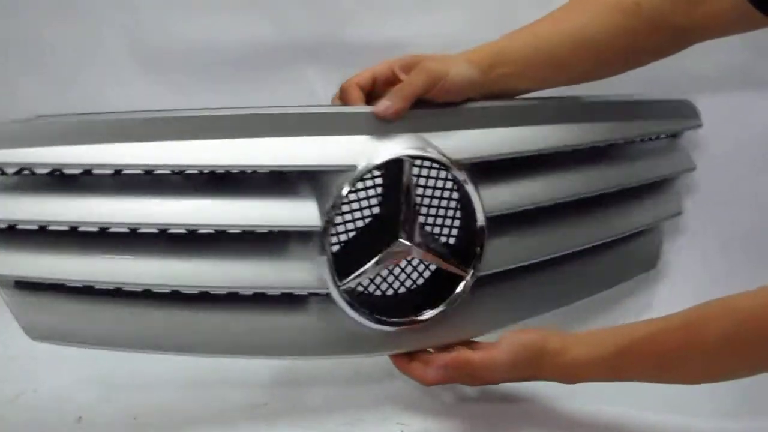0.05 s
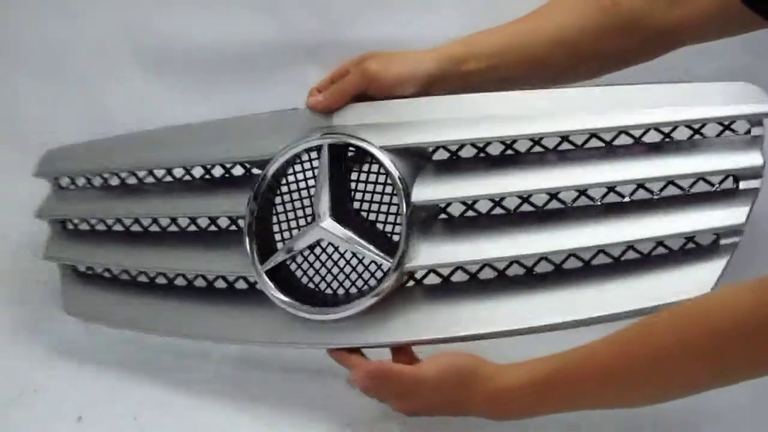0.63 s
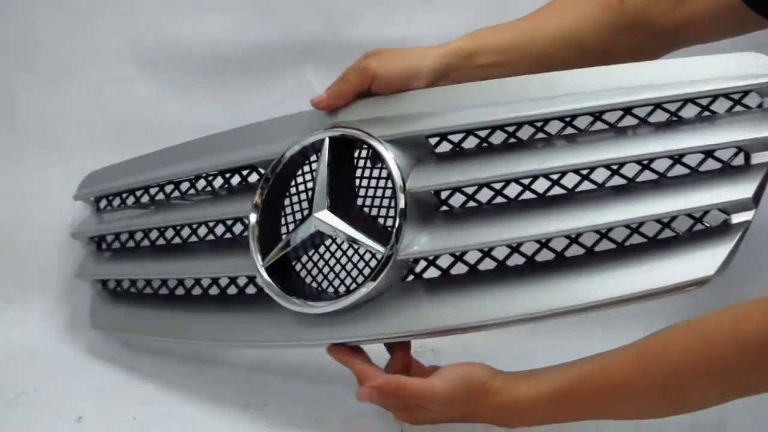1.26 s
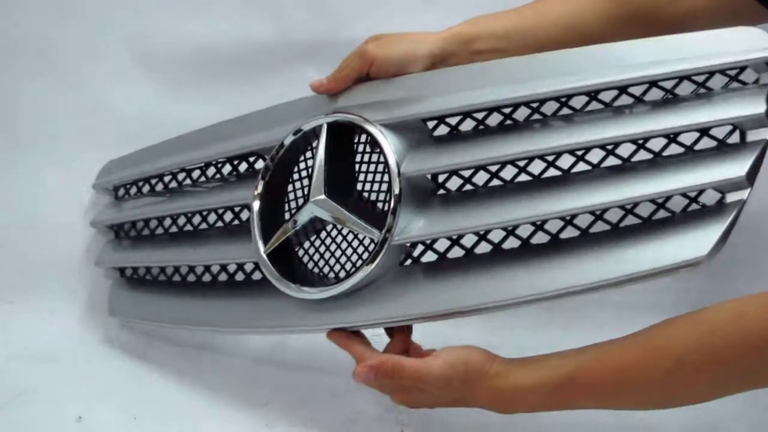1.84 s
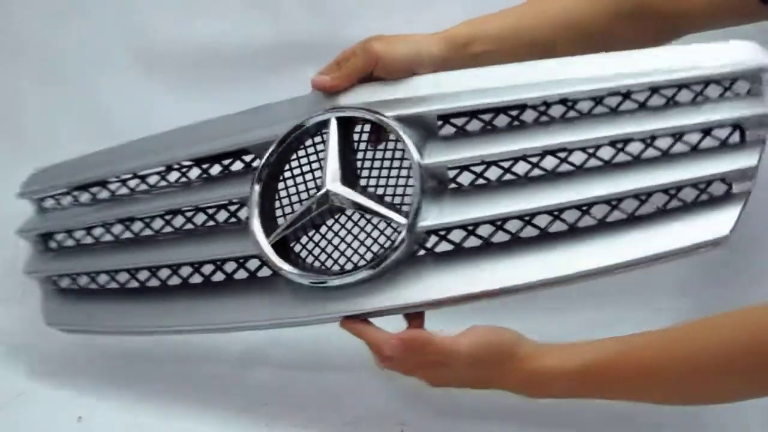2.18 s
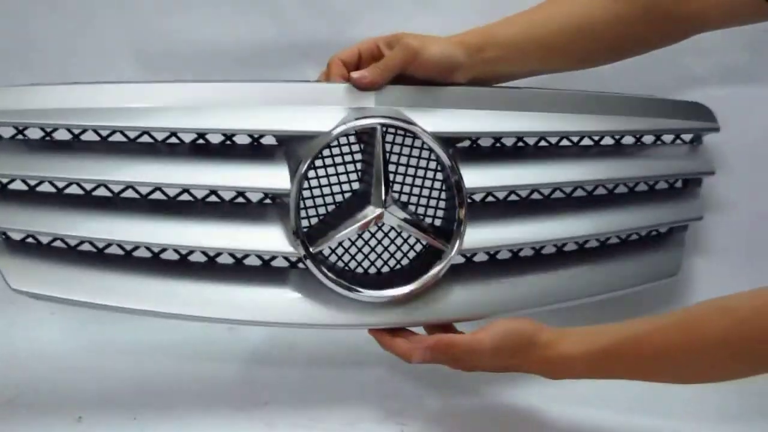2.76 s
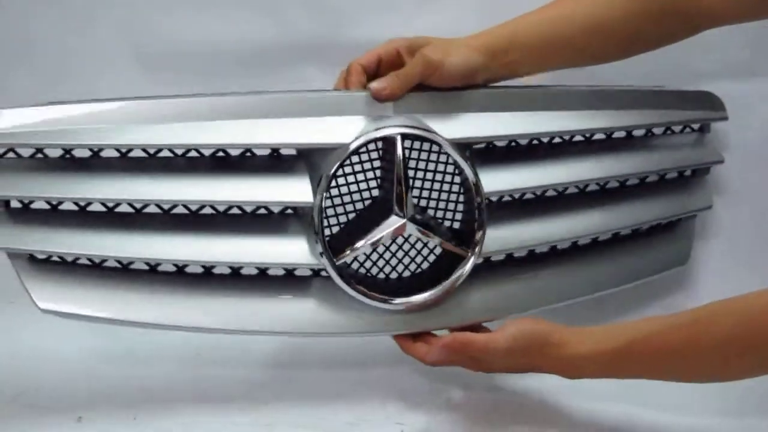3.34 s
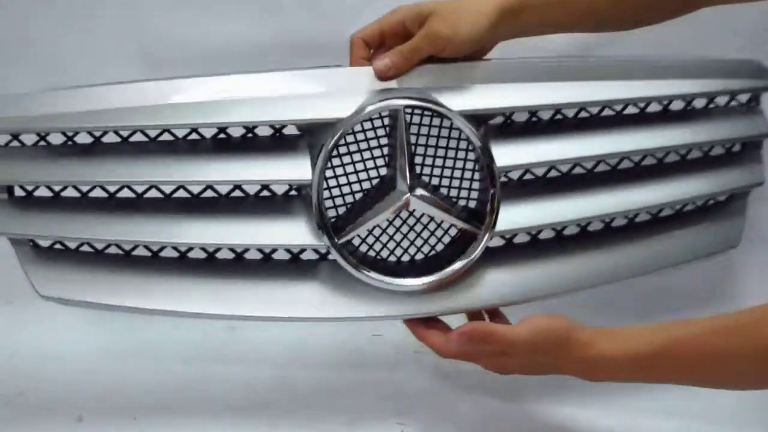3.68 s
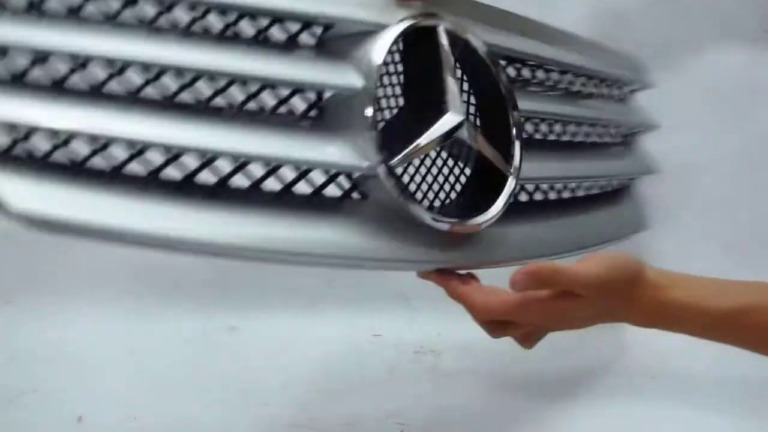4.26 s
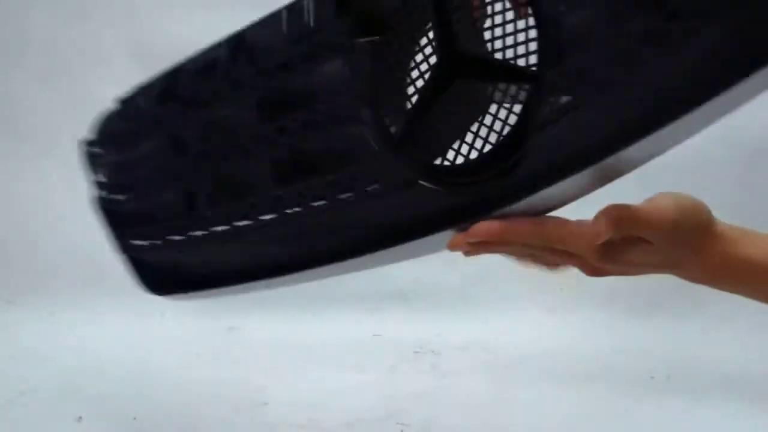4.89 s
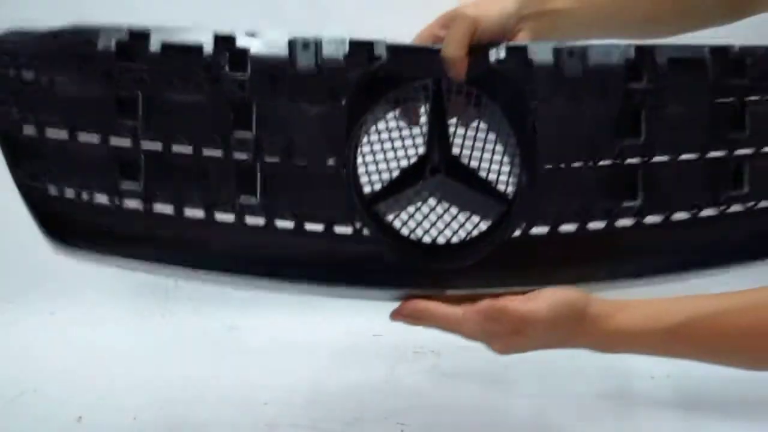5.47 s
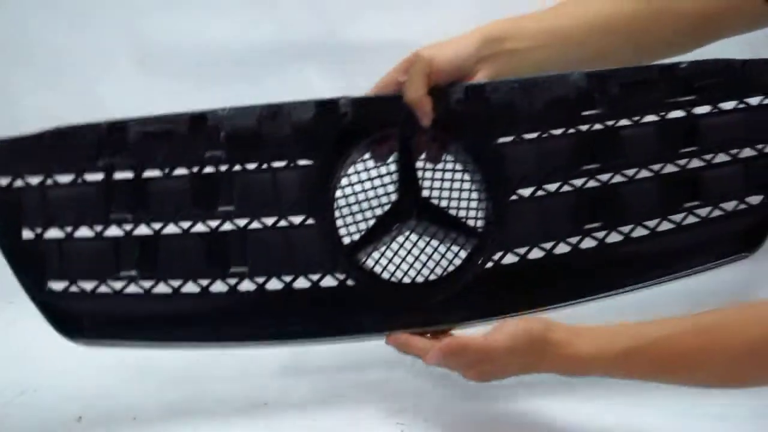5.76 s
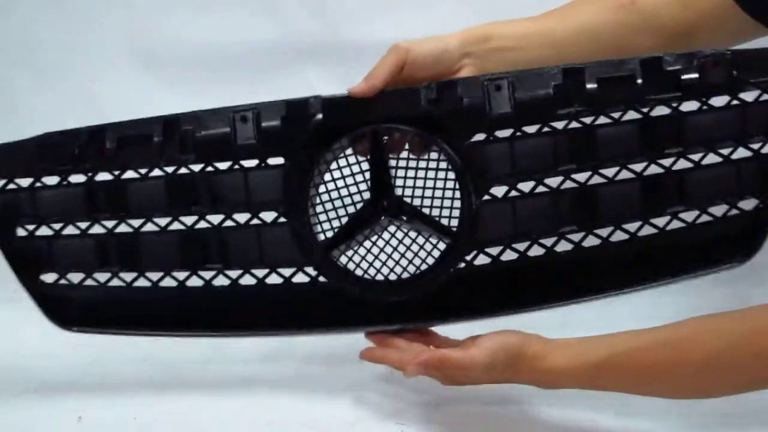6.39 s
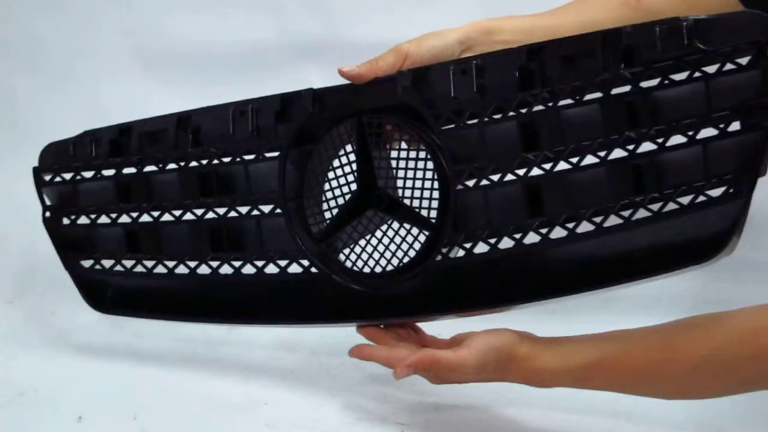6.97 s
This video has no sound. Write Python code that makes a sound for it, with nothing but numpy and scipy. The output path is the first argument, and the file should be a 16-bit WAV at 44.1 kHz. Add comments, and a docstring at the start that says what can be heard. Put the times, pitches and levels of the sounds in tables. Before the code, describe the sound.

Soft rubs, dull bumps and a few clicks come from a plastic car grille held in two hands. After a quieter stretch of sparse touches, it turns over with a longer scrape and a cluster of clicks. More light rubbing leads to a brief, loud thumb scrape that makes the shell ring. The sound is heard through a small stereo microphone in a small room with a faint low hum and hiss.

```python
"""Soft rubs, scrapes and clicks: two hands show a large plastic car grille, then turn it over.
Skin catches and lets go in many tiny slips that make the shell ring, now and then skidding or swishing.
The plastic clicks as it bends, and palms bump it softly. A faint low hum and hiss lie behind,
in a small, quiet room heard by a small stereo camera."""
import sys
import numpy as np
from scipy import signal
from scipy.fft import rfft, irfft
from scipy.io import wavfile
from scipy.ndimage import uniform_filter1d

SR = 44100
rng = np.random.default_rng(int(sys.argv[2]) if len(sys.argv) > 2 else 0)


def digitize_waveform(pressure):
    """Quantize a signal to 16-bit integers and store it at the path in sys.argv[1].

    Rows of a 2-D input are taken as channels; values are limited to [-1, 1].
    """
    field = np.atleast_2d(pressure).T
    bounded = np.clip(field, -1, 1)
    quanta = np.round(bounded * 32767).astype(np.int16)
    wavfile.write(sys.argv[1], SR, quanta)


N = 309968
T = np.arange(N) / SR
TAPS = 16384  # samples in a filter's response
FREQS = np.arange(TAPS // 2 + 1) * SR / TAPS
RIM, BACK, FINGERTIPS = 2, 3, 4  # where the shell is touched: columns of the modes table in grille()


def undb(db):
    """Turn decibels into a gain, a number to multiply by."""
    return 10 ** (np.asarray(db) / 20)


def shape(points, column=1):
    """Gain at every frequency, from a table of f/Hz and level/dB columns."""
    rows = np.array(points)
    return undb(np.interp(np.log(FREQS + 1), np.log(rows[:, 0]), rows[:, column]))


def below(hz, order=4):
    """Share of the power that a low-pass filter keeps at each frequency."""
    return 1 / (1 + (FREQS / hz) ** (2 * order))


def causal(gain):
    """The quickest filter response that has this gain at each frequency."""
    cepstrum = irfft(np.log(gain + 1e-6))
    forward_only = np.r_[1, np.full(TAPS // 2 - 1, 2), np.zeros(TAPS // 2)]
    return irfft(np.exp(rfft(cepstrum * forward_only)))


def through(x, response):
    """Pass a sound through a filter's response."""
    return signal.fftconvolve(np.atleast_2d(x), np.atleast_2d(response), axes=1)[:, :x.shape[-1]]


def band(x, hz, width):
    """Keep only the sound around one pitch, scaled to strength 1."""
    edges = np.minimum(hz * np.exp(np.array([-.5, .5]) * width / hz), SR * 9 / 20)
    kept = signal.sosfilt(signal.butter(2, edges, "bandpass", fs=SR, output="sos"), x)
    return kept / kept.std()


def wander(rate):
    """A random curve that heads for a new value rate times a second."""
    return 1.55 * np.interp(T * rate, np.arange(N // 20), rng.standard_normal(N // 20))


def diffuse(size, alike_hz):
    """Noise from all sides: left and right are alike in the bass, unrelated in the treble."""
    mid, side = rng.standard_normal((2, size))
    alike = below(alike_hz, order=1)
    common = through(mid, causal(np.sqrt((1 + alike) / 2)))
    opposed = through(side, causal(np.sqrt((1 - alike) / 2)))
    return common + np.array([[1], [-1]]) * opposed


def burst(start, rise, length, decay):
    """A loudness curve that rises, holds until its length is over, then fades; times in seconds."""
    curve = np.zeros(N)
    on = (T > start) & (T < start + length + 10 * decay)
    age = T[on] - start
    curve[on] = np.minimum(age / rise, 1) * np.exp(-np.maximum(age - length, 0) / decay)
    return curve


def swell(start, length):
    """A loudness curve that swells and dies away in one arch."""
    return np.sin(np.pi * np.clip((T - start) / length, 0, 1))


def strokes(rows, attack, release):
    """Two force curves, rasp (highs) and body (lows), for separate strokes of the hand."""
    return sum(undb([[rasp_db], [body_db]]) * burst(start, attack, length, release)
               for start, length, rasp_db, body_db in rows)


def scrape(rows):
    """Rasp and body force curves for one unbroken scrape."""
    times, *levels = np.transpose(rows)
    return undb([np.interp(T, times, db) for db in levels]) * (T >= times[0]) * (T < times[-1])


def slips(rate, spread_db, smooth):
    """Surfaces catch and let go about rate times a second: tiny uneven ticks over smooth hiss."""
    slipping = rng.random(N) < rate / SR
    sizes = undb(spread_db * np.clip(rng.standard_normal(N), -2, 2))
    ticks = slipping * sizes * rng.choice([-1, 1], N)
    friction = ticks / ticks.std() + smooth * rng.standard_normal(N)
    return friction / friction.std()


def grille(rasp, body, place, split_hz=1300):
    """The shell rings at its own pitches (modes): rasp drives the high ones, firm pressure the low."""
    # the main modes: f/Hz, width/Hz, level/dB at the rim, at the back, under the fingertips
    modes = [(247, 12, -18, -14, -9), (345, 73, -14, -23, 2), (528, 62, -2, -7, 1),
             (656, 66, 1.5, -21, 1.5), (727, 34, -4.5, 7.5, -6.5), (792, 21, 8, -13, 2),
             (880, 25, 4, 16.5, 1), (1000, 65, 1.5, 11.5, -1.5), (1160, 57, -13, 4.5, -23),
             (1345, 54, -2, -14, -14), (1457, 18, 3, 13.5, 3), (1566, 12, 3, -8, 0),
             (1590, 73, 5.5, 11.5, -13), (1740, 57, 7, 3, 3), (1944, 23, 9.5, 6, 9.5),
             (2110, 20, -10, -1, 8.5), (2400, 330, 2.5, -19, -4), (3120, 77, -12, 5, -12),
             (3500, 230, 4, 8, 1), (4000, 33, 6, 5, -2)]
    # the crowd of other modes between them: f/Hz, level/dB
    shell = [(60, -46), (140, -46), (250, -29), (500, -15), (1000, -6), (1600, -0.5), (2500, 4.5),
             (5000, 5), (7300, 3.5), (9500, 2), (16000, -0.5)]
    power = shape(shell) ** 2
    for mode in modes:
        hz, width = mode[:2]
        power = power + undb(mode[place]) ** 2 / (1 + ((FREQS - hz) / width) ** 2) ** 2
    whole_ring = causal(np.sqrt(power))
    sound = 0
    for force, side in ((rasp, "highpass"), (body, "lowpass")):
        split = signal.butter(4, split_hz, side, fs=SR, output="sos")
        ring = signal.sosfilt(split, signal.sosfilt(split, whole_ring))
        sound = sound + through(force, ring / np.linalg.norm(ring))
    return sound


def rub(force, friction, rasp_db, body_db, place):
    """Slipping skin shakes the shell; rasp_db and body_db turn the highs and lows up or down."""
    rasp, body = force * friction
    return grille(rasp * undb(rasp_db), body * undb(body_db), place)


def finger_rubs():
    """Fingertips brush lightly over the plastic."""
    # light strokes: t/s, length/s, rasp/dB, body/dB
    touches = [(0, 0.3, -56.5, -64), (.32, 0.067, -51, -59.5), (.41, 0.12, -57.5, -62.5),
               (.66, 0.037, -51.5, -62), (.725, .045, -47.5, -65), (.83, 0.058, -60, -66),
               (1.5, .28, -62, -70.5), (2.15, .14, -51, -71), (2.38, 0.062, -52, -72),
               (2.66, 0.024, -58, -76), (3.6, 0.09, -54.5, -63.5), (3.79, 0.03, -52.5, -75),
               (3.98, 0.052, -49, -68), (4.08, .06, -62, -63.5), (5.35, 0.14, -48.5, -55.5),
               (5.49, 0.072, -49, -64.5), (5.58, 0.19, -62.5, -71), (5.755, 0.054, -51.5, -61.5),
               (5.9, .07, -59.5, -67), (5.98, 0.21, -47, -67.5), (6.15, 0.062, -47, -55.5),
               (6.31, 0.11, -57, -62), (6.7, 0.12, -57.5, -63.5), (6.83, 0.026, -52, -63),
               (6.91, 0.049, -61.5, -80)]
    force = strokes(touches, attack=0.017, release=0.031)
    friction = slips(rate=2000, spread_db=5.0, smooth=1.0)
    return rub(force, friction, rasp_db=0.5, body_db=-3.5, place=FINGERTIPS)


def room_air():
    """The air of the room makes a faint rush whose level wavers a little."""
    # tone of the air: f/Hz, level/dB per Hz
    air = [(20, -99.5), (45, -99), (110, -103), (250, -99), (700, -96), (1500, -99), (3000, -100),
           (6000, -102), (16000, -103)]
    rush = through(diffuse(N, alike_hz=258), causal(shape(air))) * np.sqrt(SR / 2)
    return rush * undb(.5 * wander(rate=4.96))


def hum():
    """A faint low tone wavers in pitch and swells for a while above its steady level."""
    hz = 61.8 + 0.89 * wander(rate=1)
    gain = undb(-85) + undb(-74) * burst(start=0.51, rise=.2, length=1.44, decay=0.52)
    return np.sqrt(2) * gain * np.sin(2 * np.pi * np.cumsum(hz) / SR)


def palm_bumps(rise_s=0.0044, decay_s=.015):
    """A soft hand muffles the shell as it lands, leaving one dull, low ring."""
    # bumps of palm and fingers: t/s, level/dB, f/Hz
    bumps = [(0.048, -57, 322), (0.188, -52.5, 420), (0.335, -50, 384), (0.678, -57, 386),
             (.901, -53.5, 168), (3.406, -61.5, 232), (3.599, -67.5, 293), (5.232, -58, 330),
             (5.265, -47, 298), (5.414, -60, 300), (5.835, -54.5, 523), (5.895, -53.5, 530),
             (6.863, -54.5, 503)]
    noise = rng.standard_normal(N)
    return sum(undb(db) * burst(start, rise_s, rise_s, decay_s) * band(noise, hz, width=0.47 * hz)
               for start, db, hz in bumps)


def flex_clicks():
    """The grille clicks as it bends: each click is a short chatter of plastic on plastic."""
    # clicks and knocks: t/s, decay/s, rasp/dB, body/dB
    clicks = [(0.6458, 0.0029, -28.5, -47), (.652, 0.0075, -35.5, -53), (.89, 0.044, -43.5, -56),
              (3.014, .012, -62, -61), (3.401, 0.015, -58.5, -51.5), (3.593, 0.012, -40.5, -56.5),
              (3.915, .005, -50.5, -50), (4.193, 0.013, -43.5, -58), (4.555, 0.0066, -34, -59),
              (5.231, .012, -34.5, -48), (5.26, 0.0072, -28, -54), (5.277, 0.0085, -24.5, -60),
              (5.41, 0.0078, -28.5, -46.5), (5.815, 0.0096, -44, -56), (5.981, 0.033, -40, -55)]
    force = 0
    for start, decay, rasp_db, body_db in clicks:
        rise = 0.17 * decay
        force = force + undb([[rasp_db], [body_db]]) * burst(start, rise, rise, decay)
    rasp, body = force * slips(rate=4000, spread_db=3, smooth=.5)
    return grille(rasp, body, FINGERTIPS)


def skids_and_swishes():
    """The sound of slipping skin gathers round one pitch in a skid and spreads high in a swish."""
    # fingertips skid: t/s, length/s, f/Hz, level/dB
    skids = [(0.718, 0.048, 2070, -52), (2.148, 0.18, 1800, -68), (3.912, 0.022, 1680, -60.5),
             (4.017, 0.024, 3960, -47.5), (4.552, 0.087, 606, -44), (4.653, 0.091, 797, -42),
             (5.213, 0.097, 1114, -42.5), (5.486, 0.093, 1570, -55.5), (5.758, 0.11, 1540, -63),
             (5.986, 0.074, 550, -53), (6.144, 0.037, 960, -51.5), (6.281, 0.057, 7100, -54.5),
             (6.468, 0.135, 1480, -37.5), (6.503, .11, 1633, -35.5)]
    # dry skin swishes over smooth paint: t/s, length/s, level/dB
    swishes = [(2.357, 0.087, -51), (3.988, 0.054, -44.5), (4.859, 0.089, -37), (5.474, 0.084, -39),
               (5.734, 0.067, -49.5), (6.15, 0.081, -49), (6.46, 0.052, -36)]
    friction = slips(rate=3300, spread_db=10, smooth=0.59)
    skidding = sum(undb(db) * swell(start, length) * band(friction, hz, width=0.1 * hz)
                   for start, length, hz, db in skids)
    swish_gain = sum(undb(db) * swell(start, length) for start, length, db in swishes)
    return skidding + swish_gain * band(friction, hz=8200, width=5900)


def rim_turn():
    """The rim scrapes round in the palm as the grille is turned over."""
    # the grip shifts as the turn begins and ends: t/s, length/s, rasp/dB, body/dB
    grips = [(4.407, 0.059, -44.5, -52), (5.222, 0.053, -36, -44.5)]
    # force of the turning scrape: t/s, rasp/dB, body/dB
    turn = [(4.484, -60, -51), (4.492, -43, -41), (4.556, -32, -38.5), (4.62, -36.5, -43), (4.75, -30, -34),
            (4.812, -39, -39.5), (4.86, -35.5, -38), (4.894, -35, -44.5), (5.114, -34.5, -40),
            (5.22, -44.5, -59.5)]
    force = strokes(grips, attack=0.01, release=0.022) + scrape(turn)
    friction = slips(rate=2400, spread_db=1.5, smooth=0.93)
    return rub(force, friction, rasp_db=2.0, body_db=-3.0, place=RIM)


def thumb_slide():
    """The thumb slides off the ribbed back with a short, grainy scrape."""
    # force of the thumb: t/s, rasp/dB, body/dB
    slide = [(6.456, -48, -80), (6.466, -34.5, -35.5), (6.474, -30.5, -31), (6.496, -29.5, -53),
             (6.514, -27, -29), (6.574, -29, -34), (6.64, -35.5, -54), (6.72, -74, -81)]
    friction = slips(rate=2600, spread_db=1.0, smooth=0.31)
    return rub(scrape(slide), friction, rasp_db=2.5, body_db=-3.0, place=BACK)


def slat_echoes(decay_s=.003):
    """Quick echoes off the grille's slats, different left and right, evened out in tone."""
    echoes = rng.standard_normal((2, TAPS)) * np.exp(-T[:TAPS] / decay_s)
    powers = uniform_filter1d(np.abs(rfft(echoes)) ** 2, size=44, axis=1)
    return np.vstack([through(echo, causal(power ** -.5)) for echo, power in zip(echoes, powers)])


def wall_echoes(fade_s=0.29):
    """The walls send back a short tail of sound that falls 60 dB in fade_s."""
    age = T[:TAPS]
    tail = diffuse(TAPS, alike_hz=1090) * np.exp(-np.log(1000) * age / fade_s) * (age > .006)
    return tail / np.linalg.norm(tail, axis=1, keepdims=True)


def room(x, scatter_hz=2016, walls_db=-8, shift_hz=2.3, patterns=5):
    """Lows arrive as one wave, highs scatter off the slats, and all echoes shift as the grille moves."""
    low_share = below(scatter_hz, order=6)
    highs = causal(np.sqrt(1 - low_share))
    # the echo patterns fade into one another in a circle
    angle = 2 * np.pi * shift_hz * T
    weights = np.array([np.exp(3 * np.cos(angle + 2 * np.pi * k / patterns)) for k in range(patterns)])
    sound = through(x, causal(np.sqrt(low_share)))
    for weight in weights / np.linalg.norm(weights, axis=0):
        echoes = through(slat_echoes(), highs) + undb(walls_db) * wall_echoes()
        sound = sound + weight * through(x, echoes)
    return sound


def scene():
    """All the handling sounds in the room, over its air and hum."""
    rubbing = finger_rubs() + rim_turn() + thumb_slide()
    handling = rubbing + flex_clicks() + palm_bumps() + skids_and_swishes()
    return room_air() + room(handling) + hum()


def record(dry):
    """The two microphone openings colour the sound, hiss is added, and the highest treble is cut."""
    # each opening has its own resonance: f/Hz, left/dB, right/dB
    ports = [(398, 0.5, 1), (1290, 3, 2), (2600, 2.5, 1.5), (3260, 3.5, 1), (4770, 7.5, -2.5),
             (5090, 9, 2.5), (6200, 0, 0), (7340, -10.5, 2.5), (7930, -11.5, -0.5), (10220, -20, -11),
             (13200, -34.5, -25.5), (15200, -98, -32.5)]
    # microphone hiss: f/Hz, level/dB per Hz
    hiss_tone = [(20, -112), (1000, -104), (5000, -103), (8600, -105), (8850, -101), (9100, -105),
                 (12000, -108), (16000, -112)]
    openings = np.array([causal(shape(ports, column=1)), causal(shape(ports, column=2))])
    hiss = through(rng.standard_normal((2, N)), causal(shape(hiss_tone))) * np.sqrt(SR / 2)
    treble_cut = signal.ellip(12, .1, 70, 15760, fs=SR, output="sos")
    return signal.sosfilt(treble_cut, through(dry, openings) + hiss)


dry = scene()
out = record(dry)
digitize_waveform(out)
```